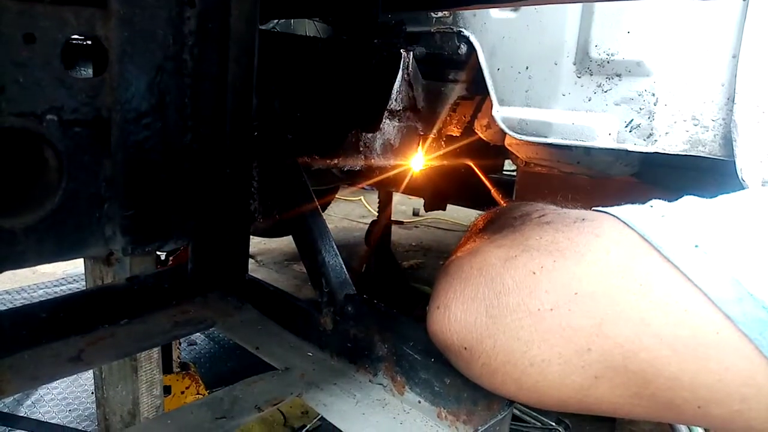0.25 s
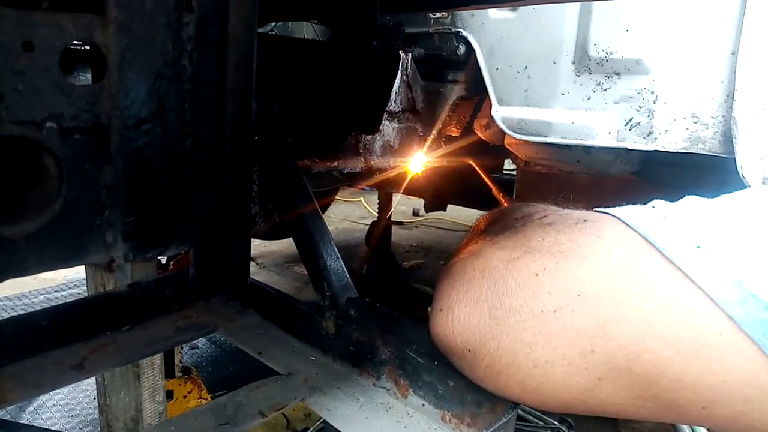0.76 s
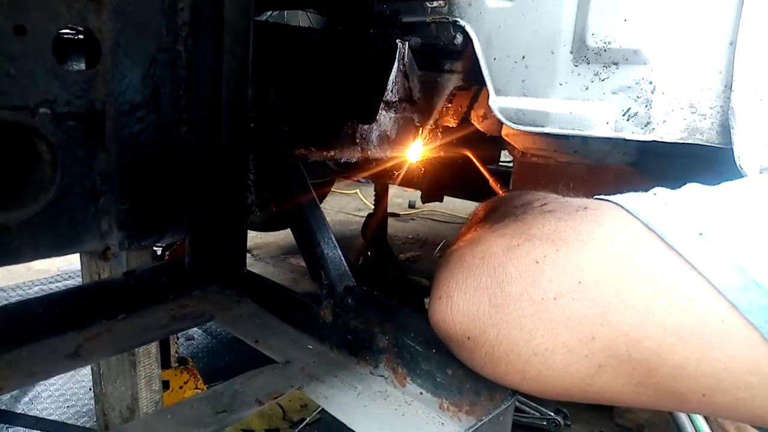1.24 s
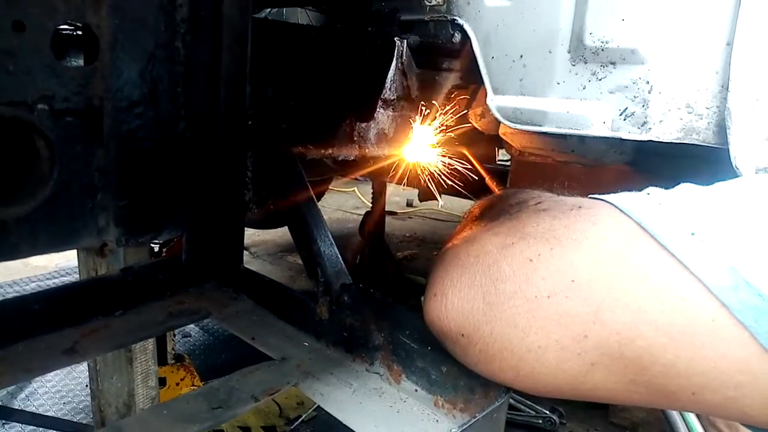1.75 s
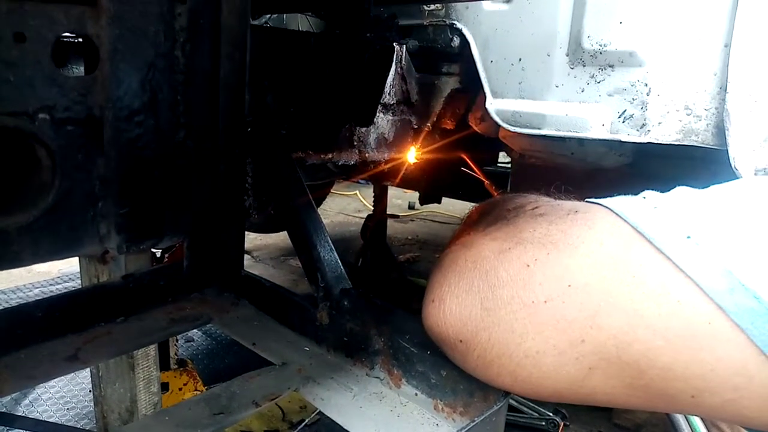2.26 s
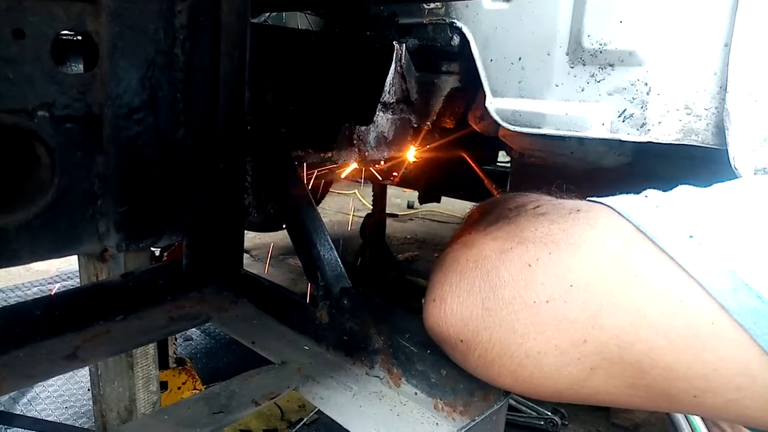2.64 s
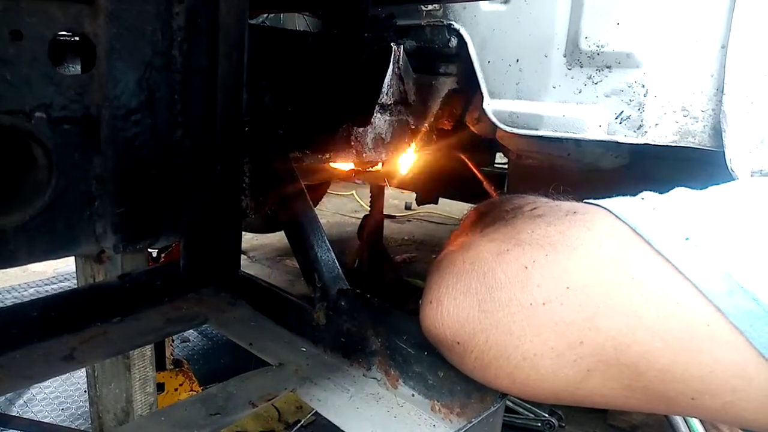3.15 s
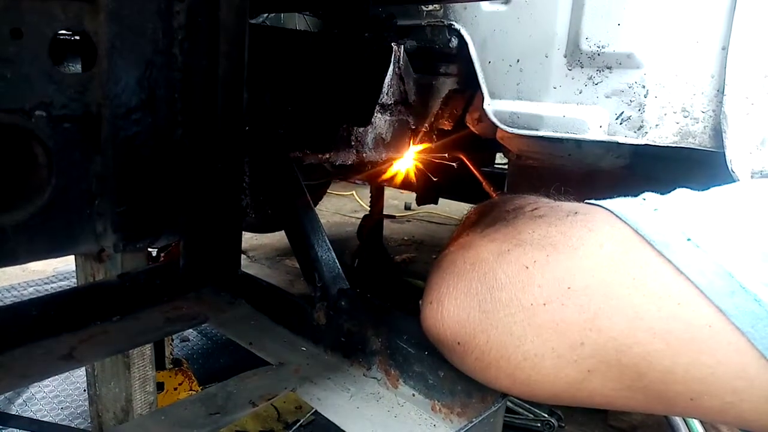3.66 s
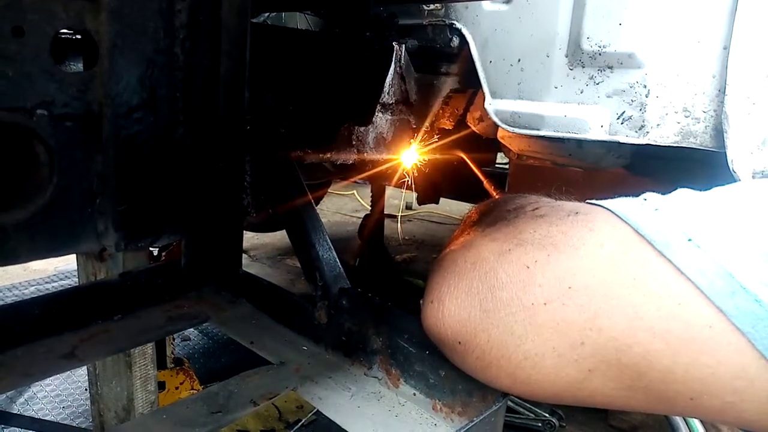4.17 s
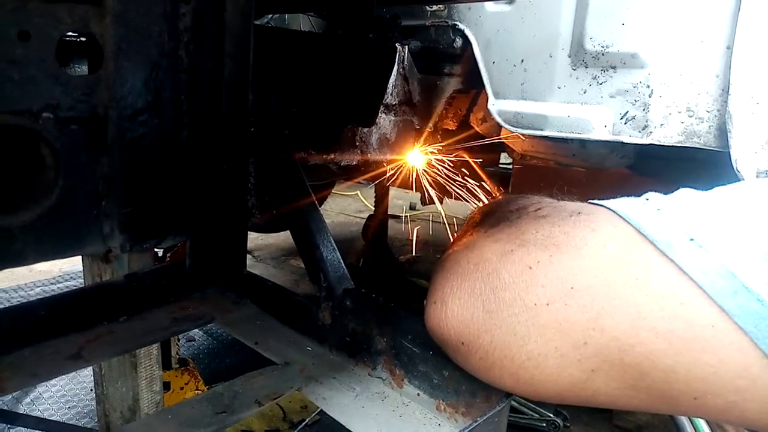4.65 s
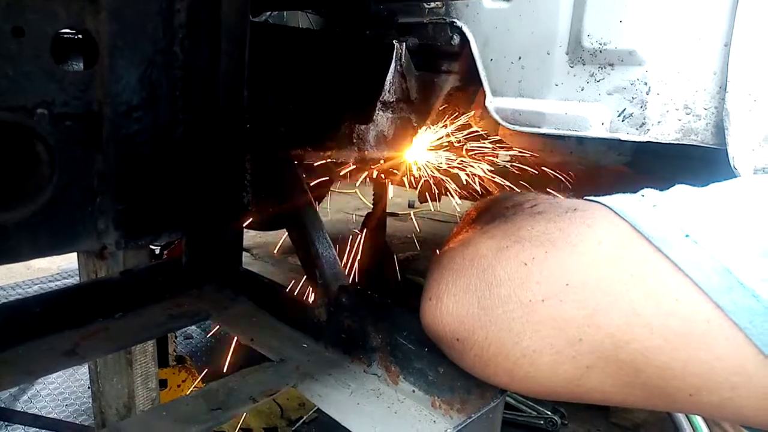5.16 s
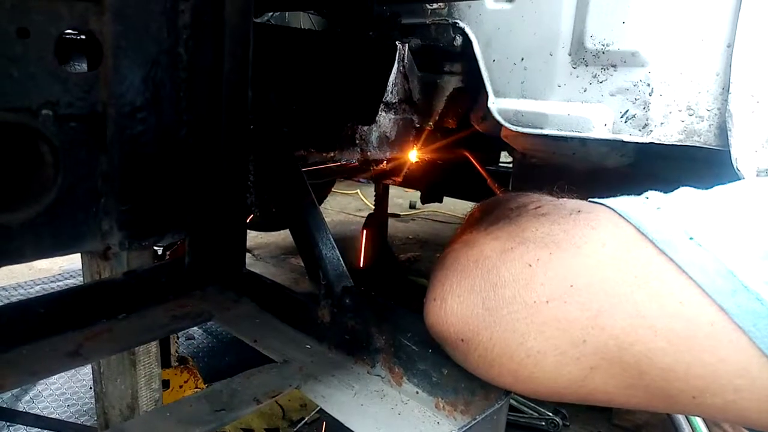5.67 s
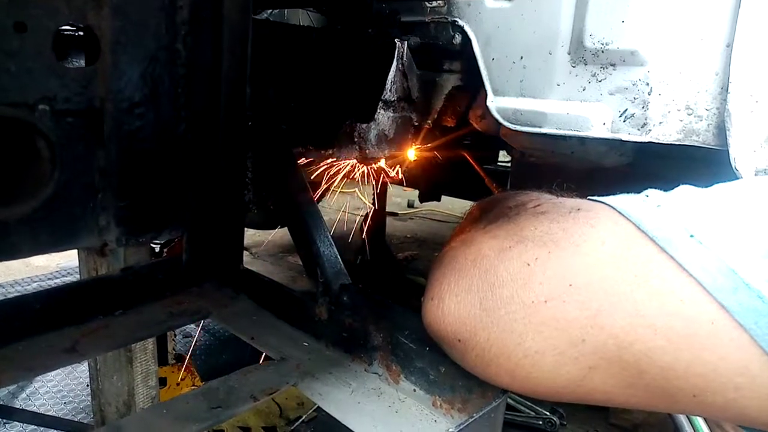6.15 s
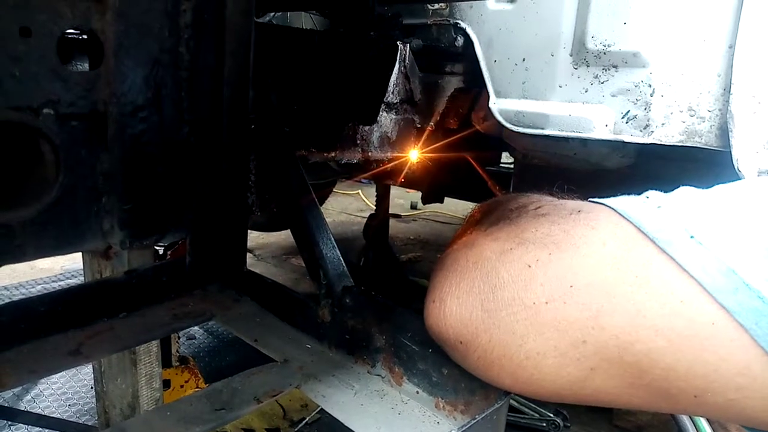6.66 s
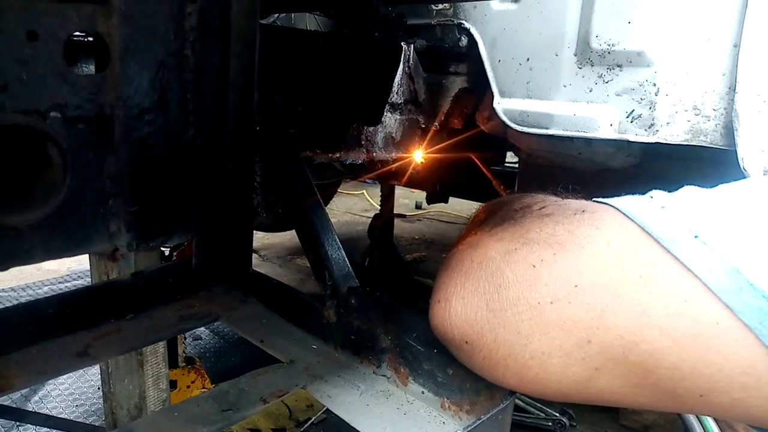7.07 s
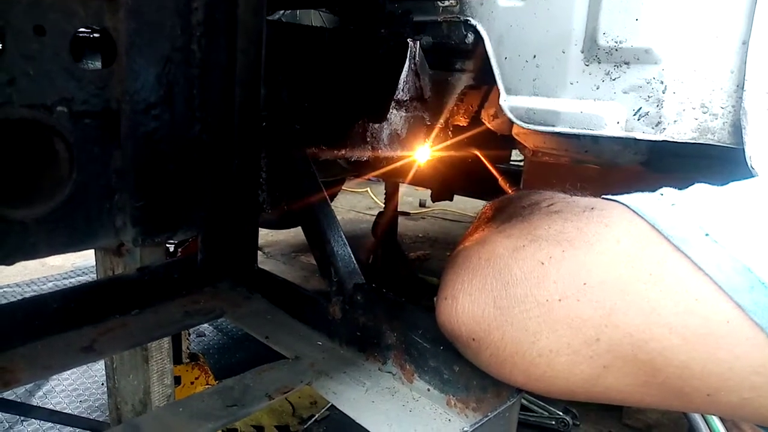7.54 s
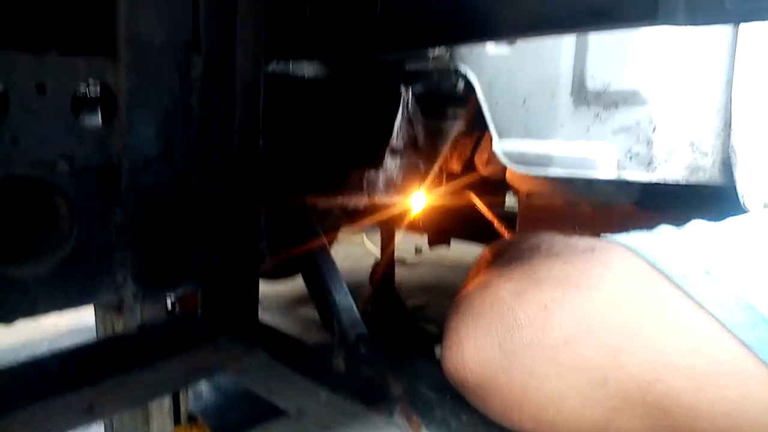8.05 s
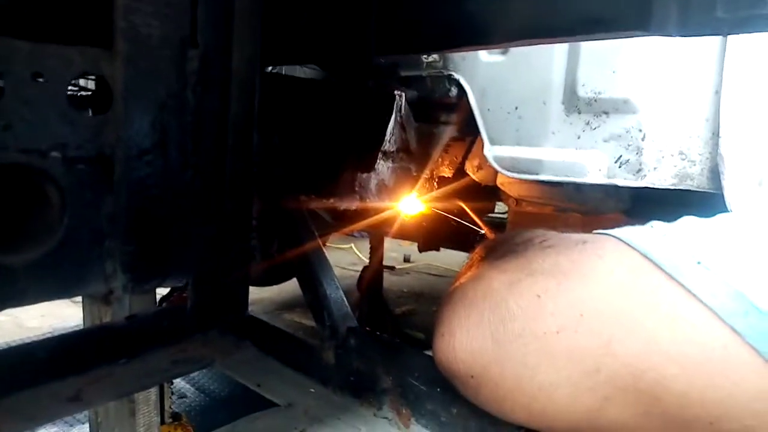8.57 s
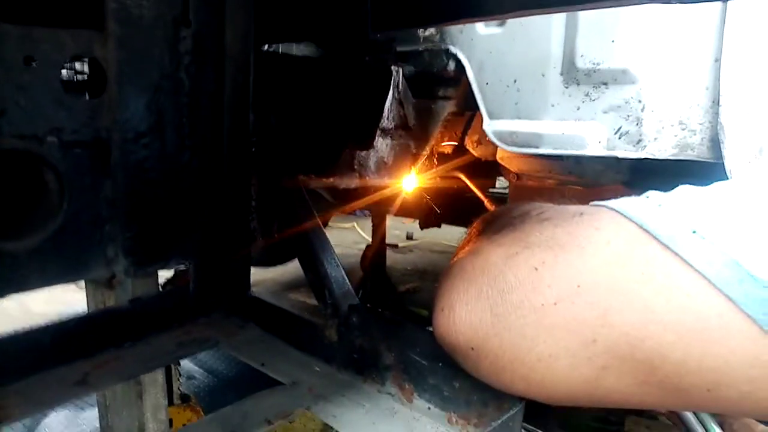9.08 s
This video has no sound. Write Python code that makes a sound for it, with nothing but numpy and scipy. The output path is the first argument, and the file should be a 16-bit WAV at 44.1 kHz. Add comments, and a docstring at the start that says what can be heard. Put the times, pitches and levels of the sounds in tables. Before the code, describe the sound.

In an open shed, a hissing jet cuts at steel, sharp and sizzling, brighter toward the left. Bursts start and stop abruptly with pops of blown-out metal and tiny crackles. The middle is steadier and thinner, with low flame roar ringing in hollow metal. After a lull come brief flares, soft handling thumps, and a last loud piercing hiss over low distant engines.

```python
"""A gas jet and flame work on steel inside an open steel frame, while a yard rumbles far off throughout.
A strong hiss swells first; taps on the microphones and short bursts follow, with spits of blown-out metal.
Longer spells of filtered noise fill the middle, with roar ringing in the hollows of the cut and wavering whistles.
After a quiet gap the bursts return; late on, fingers knock mostly the right of two microphones, by damped
cosines, and the last strong hiss carries a high whistle. Delayed copies and a noise tail place the jet in the frame."""
import sys
import numpy as np
from scipy import signal
from scipy.fft import rfft, irfft, next_fast_len
from scipy.io import wavfile

SR = 44100
rng = np.random.default_rng(int(sys.argv[2]) if len(sys.argv) > 2 else 0)


def convert_level_to_amplitude(level_db):
    """Map a level in decibels to its linear amplitude factor."""
    exponent = np.asarray(level_db, float) / 20
    return 10 ** exponent


def put_to_file(sound):
    """Save the sound as 16-bit audio at rate SR, in the file named by the first command-line argument."""
    columns = np.atleast_2d(sound).T  # one column per channel
    safe = np.clip(columns, -1, 1)
    whole_steps = np.round(safe * 32767)
    wavfile.write(sys.argv[1], SR, whole_steps.astype(np.int16))


N = 410571

# Frequency grid in Hz, with room for a tail of one second
HZ = np.maximum(np.fft.rfftfreq(next_fast_len(N + SR), 1 / SR), 1)
# Spectrum of the jet's hiss. Each row: frequency in Hz, relative density in dB per Hz.
HISS_SPECTRUM = [(1060, -47), (1800, -23.5), (2610, -11), (2940, -9), (3230, -8.5), (3640, -11),
                 (4330, -3.5), (4710, -6), (5610, -1), (6570, 4), (9240, 4), (11000, -26), (14300, -13),
                 (22000, -120)]
LEFT_LEAD_S = 0.00099  # far sound reaches the left microphone first


def rms_one(x):
    """Normalisation: a signal divided by its root mean square has unit power."""
    return x / np.sqrt(np.mean(x ** 2) + 1e-20)


def in_time(rows):
    """Linear interpolation turns each column of a timed table into a curve with one value a sample."""
    s, *columns = np.transpose(rows)
    return [np.interp(np.arange(N) / SR, s, c) for c in columns]


def at_hz(points):
    """Interpolation along log frequency spreads a spectrum table over the grid."""
    hz, values = np.array(points).T
    return np.interp(np.log(HZ), np.log(hz), values)


def shaped(x, response):
    """Linear filtering: the spectrum is multiplied by a frequency response."""
    return irfft(rfft(x, 2 * len(HZ) - 2) * response)[..., :N]


def above(hz):
    """Crossover: a smooth weight that passes the spectrum above one frequency."""
    return 1 / (1 + (hz / HZ) ** 12)


def drift(rate):
    """Low-passed noise: a random curve of unit rms from two equal poles at rate Hz."""
    r = np.exp(-40 * np.pi * rate / SR)  # computed at every 20th sample
    noise = rng.standard_normal(N // 20 + 4002)
    slow = signal.lfilter([1], [1, -2 * r, r * r], noise)[4000:]
    return np.interp(np.arange(N) / 20, np.arange(len(slow)), rms_one(slow))


def spell(start, end, first, last, rise_db_per_s, fall_db_per_s):
    """Straight course of a value from start to end, with exponential onset and decay as dB lost outside."""
    t = np.arange(N) / SR
    value = np.interp(t, [start, end], [first, last])
    lost_db = rise_db_per_s * np.maximum(start - t, 0) + fall_db_per_s * np.maximum(t - end, 0)
    return value, lost_db


def blowing():
    """Source strength: the strongest spell sets the hiss and roar levels, and a pilot flame is their floor."""
    # Each row: start and end in seconds, hiss level in dB at start and at end, roar above the hiss in dB.
    spells = [(0.0, .556, -26.5, -23, -17.5), (0.52, 0.595, -24, -17.5, -16), (0.647, 0.724, -48, -54, 8.5),
              (0.967, 1.078, -50.5, -47.5, 2), (1.086, 1.78, -39, -34, -9), (1.709, 1.84, -25, -25, -16),
              (1.852, 1.886, -20, -27, -11.5), (1.918, 2.09, -46, -42, -7),
              (2.077, 2.26, -43.5, -37.5, 1.5), (2.25, 2.336, -24, -31.5, -5),
              (2.355, 2.436, -21.5, -33.5, -5), (2.48, 2.646, -31, -34, -8.5),
              (2.706, 2.768, -25, -28.5, -14), (2.788, 3.04, -46.5, -51.5, 3.5),
              (3.096, 3.176, -48.5, -43.5, -4), (3.353, 3.448, -35.5, -39, -5.5),
              (3.572, 3.636, -49, -38.5, -6), (3.702, 3.79, -46, -36, -9),
              (3.793, 4.544, -34, -28.5, -11.5), (4.56, 4.803, -27, -29, -14.5),
              (4.773, 4.863, -23, -24.5, -23.5), (4.85, 5.043, -38.5, -34, -16),
              (5.044, 5.674, -34.5, -36, -10), (5.611, 5.71, -29.5, -27.5, -13),
              (5.8, 5.837, -31, -30, -17), (5.72, 5.988, -36.5, -39.5, -7), (5.968, 6.04, -33, -27, -11.5),
              (6.044, 6.224, -26, -48, -17.5), (6.743, 6.867, -48.5, -20.5, -17),
              (7.166, 7.286, -54.5, -52.5, 4.5), (7.294, 7.626, -43, -38, -7.5),
              (7.645, 7.795, -36.5, -47, -9), (7.815, 7.87, -44.5, -46.5, -10),
              (7.9, 7.973, -44.5, -42, -5), (8.013, 8.232, -40.5, -48, -1.5),
              (8.335, 8.576, -44.5, -40.5, -2), (8.581, 8.632, -31.5, -31, -13),
              (8.663, 8.713, -29, -24, -19), (8.743, 8.782, -24, -26.5, -13.5),
              (8.75, 9.084, -26.5, -26.5, -15.5), (9.03, 9.177, -25.5, -23, -17),
              (9.198, 9.31, -28, -23, -12)]
    hiss_db, roar_db = np.full(N, -55.5), np.full(N, -54.5)  # pilot flame
    for start, end, first_db, last_db, depth_db in spells:
        level_db, lost_db = spell(start, end, first_db, last_db, rise_db_per_s=483, fall_db_per_s=700)
        hiss_db = np.maximum(hiss_db, level_db - lost_db)
        roar_db = np.maximum(roar_db, level_db - lost_db + depth_db)
    return hiss_db, roar_db


def spitting():
    """Transient blow-out of molten metal: hiss and roar envelopes start at once and decay exponentially."""
    # Each row: start in seconds, hiss peak in dB, 60 dB decay time in milliseconds, roar peak in dB.
    spits = [(1.0844, -42, 320, -50), (1.718, -21.5, 76, -31), (1.8685, -30, 210, -24),
             (2.235, -31, 73, -24.5), (2.275, -26, 99, -39), (2.3417, -32, 36, -39), (2.384, -39, 64, -35),
             (2.6974, -16, 46, -27.5), (2.718, -23, 25, -53), (3.6364, -30.5, 34, -52),
             (4.7676, -31, 27, -45), (4.863, -37, 100, -35.5), (5.132, -38.5, 610, -40.5),
             (5.6286, -30, 76, -46), (6.83, -30, 100, -39), (7.05, -38, 15, -66), (8.6458, -23, 79, -44),
             (9.03, -23, 44, -35)]
    envelope, t = np.zeros((2, N + SR)), np.arange(SR // 2) / SR
    for s, hiss_peak_db, t60_ms, roar_peak_db in spits:
        i = round(s * SR)
        peaks_db = np.array([[hiss_peak_db], [roar_peak_db]])
        envelope[:, i:i + len(t)] += convert_level_to_amplitude(peaks_db - 60 * t / (t60_ms / 1000))
    return envelope[:, :N]


def turbulence(flutter_db, grain_db):
    """Turbulent flow: three noises (the cut, the flame from each side) flutter together and break into eddies."""
    flutter = drift(16)
    return rms_one(rng.standard_normal((3, N)) * convert_level_to_amplitude(flutter_db * flutter + grain_db * drift(690)))


def favoured(noise, resonances, swing_db, rate):
    """Resonance: two-pole filters ring at narrow pitches, whose levels come and go as the torch moves."""
    out = 0
    for hz, width_hz, db in resonances:
        r = np.exp(-np.pi * width_hz / SR)
        poles = [1, -2 * r * np.cos(2 * np.pi * hz / SR), r * r]
        ring = signal.lfilter([1 - r, 0, r - 1], poles, noise)
        out = out + convert_level_to_amplitude(db + swing_db * drift(rate)) * ring
    return rms_one(out)


def spatter():
    """Shot noise: droplets burst at random as tiny bright cracks of uneven size."""
    bursts_per_s, spread_db = 290, 12
    sizes = convert_level_to_amplitude(spread_db * np.minimum(rng.exponential(1, N), 4)) * rng.choice([-1, 1], N)
    born = rng.random(N) < bursts_per_s * convert_level_to_amplitude(4 * drift(12)) / SR  # the rate itself drifts
    return rms_one(shaped(sizes * born, convert_level_to_amplitude(at_hz(HISS_SPECTRUM)) * above(2200) * (1 - above(10500))))


def hiss(hiss_db, top_db, low_db, half_db, spits):
    """Broadband jet noise: turbulence in four ranges, all lifted by the spits."""
    # Topmost hiss with the ports' own peak. Each row: frequency in Hz, relative density in dB per Hz.
    top_spectrum = [(9800, 0), (11000, -3), (12200, -6), (13600, -10.5), (14150, -6), (14700, 2),
                    (15300, 2), (15520, -3), (15650, -25)]
    # Narrow gaps in the frame that favour a pitch. Each row: frequency in Hz, width in Hz, relative level in dB.
    beams = [(5312, 25, -4), (5775, 60, -2), (6396, 30, 0), (6723, 45, 1), (7069, 45, 0), (7626, 60, -2),
             (8297, 60, -4), (8619, 50, -2), (9248, 35, -3), (10141, 55, -8)]
    noise, colour = turbulence(flutter_db=1.5, grain_db=1.0), convert_level_to_amplitude(at_hz(HISS_SPECTRUM))
    low = rms_one(shaped(noise, colour * above(1370) * (1 - above(4435))))
    lower = rms_one(shaped(noise, colour * above(5100) * (1 - above(6410))))
    upper = rms_one(shaped(noise, colour * above(6560) * (1 - above(10900))))
    top = rms_one(shaped(noise, convert_level_to_amplitude(at_hz(top_spectrum)) * above(7700)))
    share = np.clip(convert_level_to_amplitude(2 * half_db), 0, .9)  # power share of the lower half
    body = np.sqrt(share) * lower + np.sqrt(1 - share) * upper
    body[0] += convert_level_to_amplitude(-9) * favoured(noise[0], beams, swing_db=3.5, rate=3.0)
    body[0] += convert_level_to_amplitude(-17) * spatter()
    low_gain = convert_level_to_amplitude(low_db + 2.07 * drift(17))
    top_gain = convert_level_to_amplitude(top_db + 0.27 * drift(29))
    return (convert_level_to_amplitude(hiss_db) + spits) * (body + low_gain * low + top_gain * top)


def roar(roar_db, hollow_db, hiss_db, spits):
    """Combustion noise: broad flame turbulence also excites the cavity resonances near the cut."""
    # Spectrum of the flame. Each row: frequency in Hz, relative density in dB per Hz.
    flame_spectrum = [(120, 5), (250, 5), (500, 0), (800, -5), (1300, -7), (1900, -4), (2400, -7.5),
                      (3200, -34)]
    # Hollows near the cut. Each row: frequency in Hz, width in Hz, relative level in dB.
    cavity = [(680, 30, -11), (936, 30, -1), (1014, 36, 0), (1160, 50, -11), (1330, 50, -11),
              (1495, 45, -10), (1652, 35, -11), (1850, 60, -13), (2140, 60, -15), (2670, 90, -17)]
    rumble_top_hz = 590
    noise, colour = turbulence(flutter_db=1.5, grain_db=1.5), convert_level_to_amplitude(at_hz(flame_spectrum))
    broad = rms_one(shaped(noise, colour * above(rumble_top_hz)))
    rumble = rms_one(shaped(noise, colour * (1 - above(rumble_top_hz))))
    ringing = favoured(noise, cavity, swing_db=1.5, rate=6.0)
    share = np.clip(convert_level_to_amplitude(2 * hollow_db + 5.5), .05, .8)  # power share of the ringing
    flame = np.sqrt(1 - share) * broad + np.sqrt(share) * ringing
    # The bass follows the jet, and is freer when the flame stands clear of the hollows
    rumble_db = -58 + 0.78 * (hiss_db + 36) - 0.88 * (hollow_db + 10)
    return (convert_level_to_amplitude(roar_db) + spits) * flame + (convert_level_to_amplitude(rumble_db) + convert_level_to_amplitude(-9) * spits) * rumble


def whistles():
    """Edge tones: the jet's edge whistles, its pitch gliding with the gap, wavering in pitch and level."""
    # Each row: start and end in seconds, pitch in Hz at start and at end, rms level in dB before waver and echoes.
    tones = [(.64, .71, 1486, 1520, -51), (1.995, 2.048, 1323, 1396, -45.5),
             (2.055, 2.112, 1450, 1740, -43.5), (2.095, 2.18, 1186, 1150, -48),
             (2.128, 2.218, 1760, 1620, -50), (2.516, 2.58, 972, 940, -47),
             (2.586, 2.646, 1025, 1007, -42.5), (4.08, 4.345, 6770, 6770, -36),
             (4.522, 4.84, 6700, 6750, -40), (5.87, 6.056, 883, 885, -47.5), (6.073, 6.127, 894, 890, -58),
             (6.16, 6.238, 871, 830, -53), (6.998, 7.037, 900, 910, -50), (7.105, 7.125, 880, 885, -55),
             (7.175, 7.25, 1000, 925, -48), (7.57, 7.63, 1830, 1810, -49), (8.14, 8.173, 1460, 1445, -51),
             (9.04, 9.182, 5750, 5930, -27), (9.23, 9.304, 5700, 5930, -31)]
    edge_db_per_s = 400
    out, waver, waver_db = np.zeros(N), 1 + 0.01027 * drift(60), 4.5 * drift(45)
    for start, end, first_hz, last_hz, db in tones:
        hz, lost_db = spell(start, end, first_hz, last_hz, edge_db_per_s, edge_db_per_s)
        i = np.flatnonzero(lost_db < 60)
        phase = 2 * np.pi * np.cumsum(hz[i] * waver[i]) / SR
        out[i] += convert_level_to_amplitude(db - lost_db[i] + waver_db[i]) * np.sqrt(2) * np.sin(phase)
    return out


def echoes(x, rows):
    """Specular reflection: delayed copies add up, and swell and fade as the torch moves, the direct one less."""
    out = np.zeros(N)
    for k, (ms, db, sign) in enumerate(rows):
        lag = round(ms * SR / 1000)
        swing_db = 1.6 if k else .6
        out[lag:] += np.sign(sign) * convert_level_to_amplitude(db + swing_db * drift(1.25)[lag:]) * x[:N - lag]
    return out


def shed():
    """Diffuse reverberation: a fast scatter among the beams, then the open shed's tail, unrelated at each side."""
    scatter_t60_s, tail_t60_s, tail_rise_s = .04, .25, 0.0092
    t = np.arange(SR // 2) / SR
    scatter = convert_level_to_amplitude(-26.5 - 60 * t / scatter_t60_s)
    tail = convert_level_to_amplitude(-38 - 60 * t / tail_t60_s) * np.minimum(t / tail_rise_s, 1)
    response = rng.standard_normal((2, len(t))) * (scatter + tail)
    return rfft(response, 2 * len(HZ) - 2) / (1 + 1j * HZ / 16000)  # one-pole treble loss


def to_microphones(jet, turn_db):
    """Superposition of paths: the cut comes direct and by echoes, the flame by the tail; each port colours both."""
    # Paths from the jet to each microphone. Each row: delay in milliseconds, level in dB, sign.
    paths_left = [(0, -14, 1), (1.24, -18.5, -1), (1.8, -39, -1), (4.0, -14.5, 1), (5.56, -24, 1)]
    paths_right = [(0.898, -3, 1), (1.742, -10.5, 1), (2.12, -27, 1), (2.33, -16.5, -1), (3.349, -14, 1),
                   (4.75, -14.5, 1), (6.55, -16, 1)]
    # Colour of the ports. Each row: frequency in Hz, left minus right in dB.
    balance = [(300, 5), (700, 2.5), (1200, 5.5), (3000, 3), (5000, 7.5), (6500, 7), (8000, 11.5),
               (9000, -1.5), (10500, 2), (12500, -1.5), (15200, -6)]
    direct = np.array([echoes(jet[0], paths_left), echoes(jet[0], paths_right)])
    arriving = direct + shaped(jet[1:], shed())
    side = np.array([[.5], [-.5]])
    port, treble = convert_level_to_amplitude(side * at_hz(balance)), above(7100)
    turned = convert_level_to_amplitude(side * (turn_db - np.median(turn_db)) * 2.63)  # only the treble turns with the hand
    return shaped(arriving, port * (1 - treble)) + turned * shaped(arriving, port * treble)


def bumps():
    """Damped vibration: each touch is a low push that rings out, a one-sided tap and a brief scratch."""
    # Fingers on the housing. Each row: start in seconds, push level in dB, ring in Hz, left minus right in dB,
    # tap level in dB.
    touches = [(0.3968, -16, 124, -21, -7.5), (0.4225, -40, 150, -12, -20.5), (0.6, -37, 150, 6.5, -29),
               (4.773, -43, 296, -7, -21), (7.895, -21, 107, -20, -50), (7.922, -15.5, 231, -19, -46),
               (7.933, -14, 113, -10, -50), (7.963, -12, 153, -13, -50), (7.982, -16, 110, -13, -50),
               (8.612, -18, 150, -15, -50), (8.626, -22, 140, -15, -50), (8.6502, -33, 250, -27, -13),
               (8.652, -38, 250, -20, -18), (8.659, -31, 220, -25, -14), (8.6677, -18, 184, -30, -13.5),
               (8.6804, -26, 130, -30, -14), (8.7057, -21, 198, -25, -13), (8.707, -37, 130, -21, -20),
               (9.298, -45, 200, -8, -21)]
    push_cycles = 4.7  # a push dies by 60 dB in this many cycles
    out, t = np.zeros((2, N + SR)), np.arange(SR // 5) / SR
    for s, push_db, hz, pan_db, tap_db in touches:
        rise_s = 0.0027 if tap_db < -40 else 0.00019  # a fingertip presses slowly, a knock starts at once
        ring = convert_level_to_amplitude(push_db - 60 * t * hz / push_cycles) * np.cos(2 * np.pi * hz * t)
        push = ring * (1 - np.exp(-t / rise_s))
        tap = convert_level_to_amplitude(tap_db) * (np.exp(-t / 0.0007) - np.exp(-t / .0001))
        rasp = signal.lfilter([.6], [1, -.6], rng.standard_normal(len(t)))
        scratch = convert_level_to_amplitude(tap_db - 8.5 - 60 * t / 0.075) * rasp
        i = round(s * SR)
        out[:, i:i + len(t)] += (push + tap + scratch) * convert_level_to_amplitude([[pan_db], [0]])
    return out[:, :N]


def yard():
    """Partial coherence: far engines and air share a part that leads at the left; the grip rumbles at the right."""
    # Spectrum of the yard. Each row: frequency in Hz, relative density in dB per Hz.
    yard_spectrum = [(15, -77), (25, -52), (56, -7), (143, -2.5), (176, -13.5), (226, -16.5), (349, -18),
                     (439, -13), (482, -13), (894, -17.5), (1290, -23.5), (1410, -18), (2630, -24.5),
                     (4770, -35), (6000, -56), (7800, -73), (13200, -120)]
    # Each row: frequency in Hz, power share common to both microphones.
    common_share = [(40, 0.77), (100, 1), (200, 0.81), (500, 0.77), (1100, 0.15), (3000, 0.061)]
    # Swell of the low rumble. Each row: time in seconds, gain in dB.
    swell = [(0.0, 1.5), (0.3, -8), (0.65, 0.5), (1.37, 4), (2.2, -0.5), (3.53, 2), (4.72, -0.5),
             (6.79, 2.5), (7.65, 1), (8.43, 0.5), (8.81, -2), (9.31, -8)]
    # The grip rubs near the right port. Each row: middle and half length in seconds, peak relative to the yard in dB.
    rubs = [(.28, 0.053, -11), (2.42, 0.083, 8), (3.756, 0.94, -10), (4.71, 0.2, 3), (8.14, 0.64, -20),
            (9.31, 0.16, 6)]
    alike, colour = np.clip(at_hz(common_share), 0, 1), convert_level_to_amplitude(at_hz(yard_spectrum))
    common, left, right, rub = rfft(rng.standard_normal((4, 2 * len(HZ) - 2)))
    lag = np.exp(-2j * np.pi * HZ * LEFT_LEAD_S * np.array([[0], [1]]))
    own = np.array([left, right])
    spectrum = colour * (np.sqrt(alike) * common * lag + np.sqrt(1 - alike) * own)
    sound = rms_one(irfft(spectrum)[:, :N])
    swell_db, = in_time(swell)
    bass = shaped(sound, 1 - above(317))
    grip = rms_one(irfft(rub * colour * (1 - above(373)))[:N]) * convert_level_to_amplitude(2 * drift(8.8))
    pressure = np.full(N, convert_level_to_amplitude(-7.5))  # a steady hold under the rubs
    for s, half_s, db in rubs:
        pressure += convert_level_to_amplitude(db) * np.maximum(1 - np.abs(np.arange(N) / SR - s) / half_s, 0)
    bass[1] += grip * pressure
    waver_db = 0.8 * drift(2.5)
    return convert_level_to_amplitude(-45.5) * (shaped(sound, above(271)) + convert_level_to_amplitude(swell_db + waver_db) * bass)


def hum():
    """Periodic machine tones: faint sines that waver in strength and phase and reach the left first."""
    # Far machines. Each row: frequency in Hz, rms level in dB before the waver.
    machines = [(102.3, -61), (226.1, -62.5), (376.8, -64)]
    t = np.arange(N) / SR - LEFT_LEAD_S * np.array([[0], [1]])
    out = 0
    for hz, db in machines:
        strength = np.sqrt(2) * convert_level_to_amplitude(db + 3.0 * drift(0.93))
        out = out + strength * np.sin(2 * np.pi * (hz * t + 0.35 * drift(2.3) + rng.random()))
    return out


def scene():
    """Linear superposition of jet, yard, hum and handling."""
    # The hand's pose. Each row: time in seconds, treble lean to the left in dB before its scaling about the median,
    # topmost hiss above the hiss in dB, low hiss above its rule in dB, main hollow in dB before its share is formed.
    pose = [(0.0, 7.5, -0.5, -2.5, -9.5), (0.35, 6.5, -1, -0.5, -15), (0.6, 7, -3.5, 2.5, -11),
            (0.85, 6, -23, -1, 4), (1.05, 7.5, -0.5, 3.5, -7), (1.66, 7, 2.5, 4, 0),
            (1.9, 6.5, -12.5, 2, -4), (2.1, 7, -5, 4, 6), (2.31, 7, -15, 5, -4.5), (2.75, 7, -4, 0.5, -6),
            (3.0, 7, -11, 4.5, 4), (3.6, 6, -18, 2, -10), (3.85, 6, 2.5, 1.5, -2), (4.56, 7.5, -6, 2, 1),
            (5.5, 7, -5, 0, -4), (6.1, 7, -5.5, 1.5, -7), (6.5, 7, -8, 1, -9), (6.87, 7, -4.5, 1, 1),
            (7.05, 6, -12, 0, -4), (7.35, 6, -2.5, 0.5, -5), (7.95, 6.5, -2, 0.5, -6),
            (8.3, 5.5, -3, 7.5, -0.5), (8.75, 3.5, -4, -2.5, -15), (9.31, 3, -8.5, 3.5, -4.5)]
    (hiss_db, roar_db), spits = blowing(), spitting()
    turn_db, top_db, breadth_db, hollow_db = in_time(pose)
    low_db = -8 - 0.17 * (hiss_db + 37.0) + breadth_db  # a stronger jet is thinner
    half_db = 0.5 - 1.4 * (turn_db - 5.5)  # the lower half grows as the frame's shading turns away
    jet = hiss(hiss_db, top_db, low_db, half_db, spits[0])
    jet = jet + roar(roar_db, hollow_db, hiss_db, spits[1]) + whistles()
    return to_microphones(jet, turn_db) + yard() + hum() + bumps()


def top_cut(x):
    """Nothing passes above the cut-off."""
    return signal.sosfilt(signal.butter(12, 16820, fs=SR, output="sos"), x)


def record(dry):
    """Band limitation: the recorder cuts the deep bass and the top, and adds a faint low noise of its own."""
    cut = signal.sosfilt(signal.butter(6, 64, "high", fs=SR, output="sos"), dry)
    cut = cut + convert_level_to_amplitude(-71) * np.array([drift(30), drift(30)])
    cut = signal.sosfilt(signal.cheby2(14, 60, 16000, fs=SR, output="sos"), cut)
    return top_cut(cut)


dry = scene()
out = record(dry)
put_to_file(out)
```